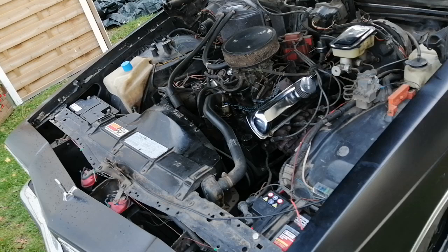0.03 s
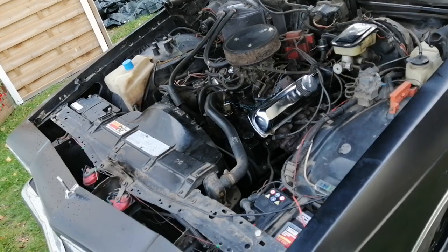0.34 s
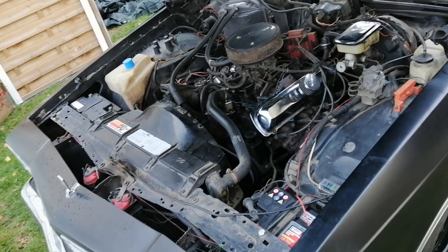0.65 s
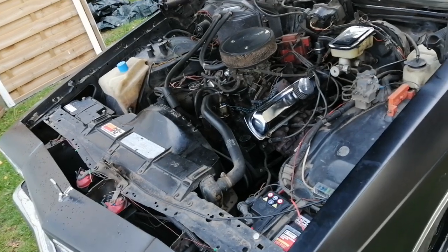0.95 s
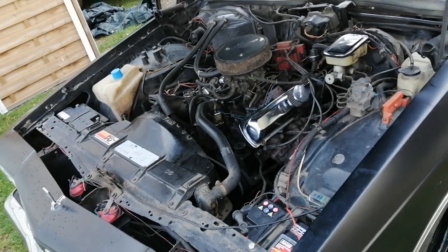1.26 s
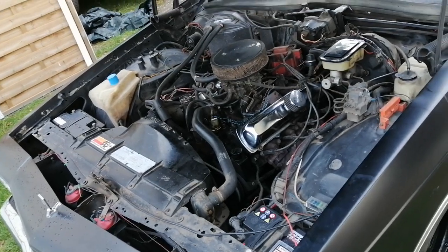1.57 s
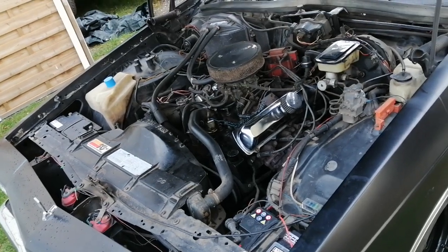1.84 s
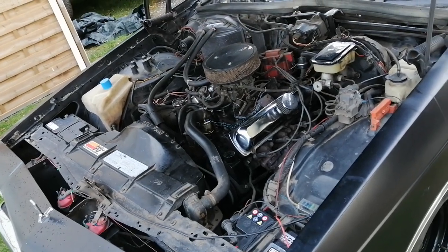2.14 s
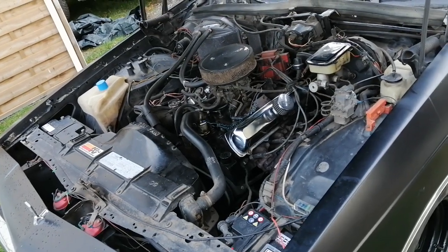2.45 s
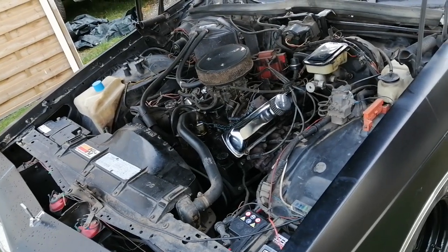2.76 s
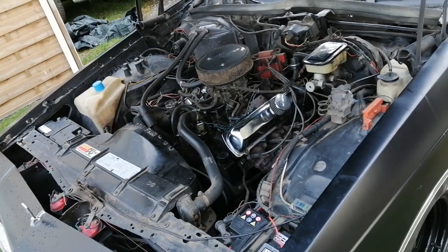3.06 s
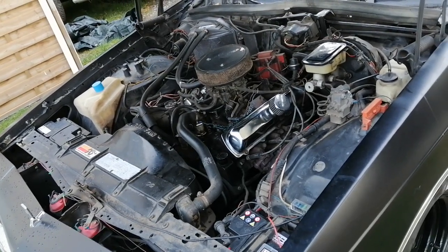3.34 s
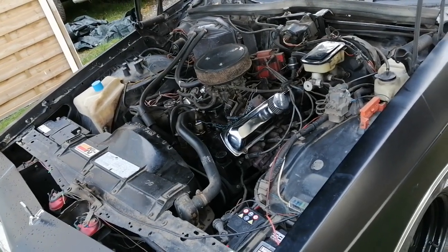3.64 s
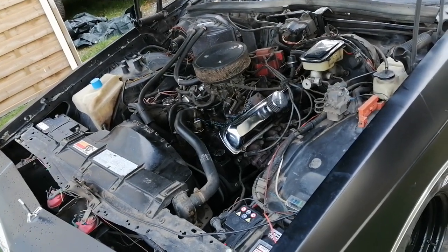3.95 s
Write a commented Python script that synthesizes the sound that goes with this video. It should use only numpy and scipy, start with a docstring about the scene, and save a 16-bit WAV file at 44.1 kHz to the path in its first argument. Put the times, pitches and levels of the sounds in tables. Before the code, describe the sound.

An old car engine cranks, catches and revs up into a heavy fast idle.

```python
"""Old V8 starting outdoors

A stereo pair stands close beside the open engine bay, in a quiet yard with light rustling.
The solenoid clacks, the pinion hits the ring gear and the starter grinds. The engine catches:
single exhaust thumps race up into the drone of a heavy fast idle, under the clatter of fan and
tappets. The pinion skips out of mesh and the released starter whines down."""
import sys
import numpy as np
from scipy import signal
from scipy.fft import rfft, irfft
from scipy.io import wavfile
from scipy.ndimage import map_coordinates

SR = 44100
rng = np.random.default_rng(int(sys.argv[2]) if len(sys.argv) > 2 else 0)


def digitize_waveform(pressure):
    """Quantize a signal to 16-bit integers and store it at the path in sys.argv[1].

    Rows of a 2-D input are taken as channels; values are limited to [-1, 1].
    """
    field = np.atleast_2d(pressure).T
    bounded = np.clip(field, -1, 1)
    quanta = np.round(bounded * 32767).astype(np.int16)
    wavfile.write(sys.argv[1], SR, quanta)


N = 176400
T = np.arange(N) / SR
HZ = np.fft.rfftfreq(N, 1 / SR)

# engine speed: t/s, firing rate/Hz
FIRING_RATE = [(2.2, 10), (2.45, 24), (2.55, 36), (2.65, 41), (2.75, 39), (2.82, 50), (2.88, 66),
               (2.94, 90), (3.0, 100), (3.08, 108), (3.35, 107), (3.5, 109), (3.8, 116), (4.0, 122)]
# strength of the eight cylinders in firing order: level/dB
CYLINDER_DB = [0, -3, -5.5, -6.5, 1.5, -4, -4, -2]


def amp(db):
    """Decibels to gain."""
    return 10 ** (np.asarray(db) / 20)


def unit(x):
    """Scales to rms 1."""
    return x / np.sqrt(np.mean(x ** 2) + 1e-20)


def curve(rows, column=1):
    """One column of a table, joined over time."""
    rows = np.array(rows)
    return np.interp(T, rows[:, 0], rows[:, column])


def level(rows, column=1):
    """Gain from a dB curve, silent before its first point."""
    return amp(curve(rows, column)) * (T >= rows[0][0])


def spectrum(points):
    """A table joined over log frequency."""
    f, value = np.transpose(points)
    return np.interp(np.log(HZ + 1), np.log(f + 1), value)


def colour(x, db):
    """Causal filter with the given dB response."""
    cepstrum = irfft(np.log(amp(np.maximum(db, -100))), N)
    causal = 2 * cepstrum * (np.arange(N) < N // 2) * (T > 0)
    taps = irfft(np.exp(rfft(causal)), N)[:4096]
    return signal.fftconvolve(np.atleast_2d(x), taps[None], axes=1)[:, :N]


def drift(hz):
    """Random wander of rms 1, mostly slower than hz."""
    coarse = T[::20]
    bins = rfft(rng.standard_normal(len(coarse)))
    smooth = irfft(bins * np.exp(-(HZ[:len(bins)] / hz) ** 2), len(coarse))
    return unit(np.interp(T, coarse, smooth))


def noise():
    """White noise at the two microphones, alike in the bass only."""
    # likeness of left and right: f/Hz, correlation
    likeness = [(150, .99), (450, .8), (1000, .1), (2000, -.1), (5000, 0)]
    a, b = rfft(rng.standard_normal((2, N)))
    same = np.clip(spectrum(likeness), -1, 1)
    return irfft(np.array([a, same * a + np.sqrt(1 - same ** 2) * b]), N)


def band(hz, width_hz):
    """A resonance kept ringing by friction."""
    return unit(irfft(rfft(noise()) / (1 + (2 * (HZ - hz) / width_hz) ** 2), N))


def swell(start, length, hz, width_hz, db):
    """A resonance that rises and dies away."""
    arch = np.sin(np.pi * np.clip((T - start) / length, 0, 1))
    return amp(db) * unit(band(hz, width_hz) * arch) * np.sqrt(np.mean(arch ** 2))


def place(x, balance):
    """Shares each frequency between the left and right microphone."""
    gains = amp(np.outer([.5, -.5], spectrum(balance)))
    return irfft(rfft(x) * gains / np.sqrt((gains ** 2).mean(0)), N)


def bay(x, echo=.55, decay_s=.007):
    """Quick reflections between bonnet, wings and bulkhead."""
    age = T[T < 4 * decay_s]
    taps = rng.standard_normal((2, len(age))) * np.exp(-age / decay_s) * (age > .002)
    taps *= echo / np.linalg.norm(taps, axis=1, keepdims=True)
    return unit(x + signal.fftconvolve(x, taps, axes=1)[:, :N])


def yard(air_db=-54.5, fall_db_per_s=1, waver_db=1.6, crinkle_db=1, sag_per_s=.083):
    """Outdoor air, with a soft rustle and a few scuffs close to the microphones."""
    # open air: f/Hz, level/dB
    air_colour = [(30, -8), (58, 2.5), (90, -7), (200, -7.5), (330, -15.5), (900, -15), (2800, -25),
                  (4000, -38.5), (15000, -49)]
    # rustle: t/s, level/dB
    rustle_level = [(.35, -63), (.42, -69), (.52, -60.5), (.67, -58.5), (.9, -60.5), (1.04, -64.5),
                    (1.14, -61), (1.28, -63.5), (1.85, -65), (2.0, -76.5), (2.17, -65)]
    # its hiss: f/Hz, level/dB
    rustle_colour = [(2500, -12.5), (4200, -11.5), (6000, 2.5), (7000, -9), (8000, -15), (10300, -25),
                     (11700, -18), (13000, -26), (15000, -23)]
    # small scuffs: t/s, length/s, f/Hz, width/Hz, level/dB
    scuffs = [(0.363, 0.12, 540, 110, -59), (0.795, 0.16, 508, 128, -55.5), (0.812, 0.16, 5300, 2000, -55),
              (1.057, 0.13, 4600, 2300, -57), (1.51, 0.024, 5660, 5000, -60)]
    air_gain = amp(air_db - fall_db_per_s * T - waver_db * drift(7.9))
    air = air_gain * unit(colour(noise(), spectrum(air_colour)))
    rustle = unit(colour(noise() * amp(crinkle_db * drift(200)), spectrum(rustle_colour)))
    sag = 1 - sag_per_s * (T - .5)  # the rustle slows and drops in pitch
    rustle = np.array([map_coordinates(side, [np.cumsum(sag)], order=3) for side in rustle])
    return air + level(rustle_level) * rustle + sum(swell(*row) for row in scuffs)


def clacks(attack_s=.00077, lift_octaves=.78):
    """Each steel blow sets off a dense, quickly dying ring in the engine bay."""
    # solenoid, pinion into ring gear, one caught tooth: t/s, level/dB, decay/s, f/Hz, lift/dB
    blows = [(2.175, -24.5, 0.021, 1880, 9), (2.1947, -21.5, 0.015, 750, 11.5),
             (2.839, -30, 0.006, 10000, 14)]
    # struck steel: f/Hz, level/dB
    steel_colour = [(80, -36), (218, -5.5), (380, -11), (600, -5.5), (1730, -7.5), (3770, -12.5),
                    (5280, -5), (8600, -12.5), (15000, -29)]
    out = 0
    for start, db, decay_s, centre_hz, lift_db in blows:
        age = np.maximum(T - start, 0)
        envelope = np.minimum(age / attack_s, 1) * np.exp(-age / decay_s)
        lift = lift_db * np.exp(-(np.log2((HZ + 1) / centre_hz) / lift_octaves) ** 2)
        out = out + amp(db) * envelope * unit(colour(noise(), spectrum(steel_colour) + lift))
    return out


def housing(hz):
    """Lift in dB that the starter and bell housing give at these frequencies."""
    # resonances: f/Hz, width/Hz, lift/dB
    modes = [(710, 34, 8.5), (865, 42, 12), (1200, 40, 4), (1370, 40, 2.5), (1667, 42, 16.5), (2010, 50, 9)]
    return sum(db / (1 + (2 * (hz - centre) / width) ** 2) for centre, width, db in modes)


def starter(wobble=.003, tooth_depth=.2, grain=.2, rasp_ring=.18, roughness=.38, load_s=2.376):
    """Teeth rasp and ring; the rotor whines up and coasts down, flaring at each housing resonance."""
    # grinding teeth: t/s, level/dB
    grind_level = [(2.185, -70), (2.205, -26), (2.24, -35), (2.365, -36.5), (2.39, -33.5), (2.48, -30),
                   (2.65, -31.5), (2.85, -28), (3.135, -27.5), (3.17, -32), (3.5, -35.5)]
    # their rasp: f/Hz, level/dB
    grind_colour = [(300, -19), (600, -14), (950, -6.5), (1260, -12.5), (1850, -5.5), (2320, -10),
                    (3060, -6.5), (3790, -15), (5300, -8.5), (6480, -17), (8300, -13), (10700, -27),
                    (13300, -31), (15000, -31)]
    # singing ring gear: t/s, level/dB
    gear_level = [(2.195, -58), (2.206, -31.5), (2.24, -39), (2.36, -49), (2.42, -34), (2.6, -40.5),
                  (3.1, -37.5), (3.22, -48)]
    # starter rotor: t/s, rotation/Hz, whine level/dB
    rotor = [(2.45, 112, -60), (2.58, 127.4, -52), (2.66, 138, -41.5), (2.76, 145, -40), (2.84, 153, -51),
             (3.0, 177, -51), (3.13, 194, -49), (3.22, 185.5, -41.5), (3.52, 171, -40.5), (3.6, 165, -49),
             (4.0, 144, -50)]
    # whine lines: multiple of the rotation, level/dB
    whine_lines = [(3, -6.5), (5, 2.5), (7, -12.5), (8, -7), (9, -4)]
    speed = curve(rotor)
    turns = np.cumsum(speed * (1 + wobble * drift(17.7))) / SR
    teeth = (1 + tooth_depth * np.cos(2 * np.pi * turns)) * np.exp(grain * drift(450))
    rasp = bay(colour(noise() * teeth, spectrum(grind_colour) + rasp_ring * housing(HZ)))
    dull = signal.lfilter(*signal.butter(1, 4770, fs=SR), rasp)
    rasp = np.where(T < load_s, dull, rasp)  # soft until the engine takes up the load
    mic_radians = np.array([[0], [1]])  # the whine reaches the two microphones out of step
    whine = 0
    for order, db in whine_lines:
        phase = 2 * np.pi * (order * turns + rng.random()) + mic_radians
        gain = amp(db + housing(order * speed)) * (1 + roughness * drift(35))
        whine = whine + gain * np.cos(phase)
    gear = level(gear_level) * teeth * band(hz=5250, width_hz=520)
    return level(grind_level) * rasp + gear + level(rotor, column=2) * whine


def ringing_parts():
    """Metal parts in the bay sing for a moment."""
    # brief resonances: t/s, length/s, f/Hz, width/Hz, level/dB
    rings = [(2.25, 0.16, 894, 61, -41.5), (2.254, 0.13, 1365, 40, -41), (3.028, 0.058, 3230, 130, -27),
             (3.541, 0.031, 3260, 200, -33.5)]
    return sum(swell(*row) for row in rings)


def strokes(firings, spread_db):
    """One click per firing, uneven from cylinder to cylinder; constant mean power."""
    at = np.flatnonzero(np.diff(np.floor(firings)) > 0)
    clicks = np.zeros(N)
    clicks[at] = amp(np.resize(CYLINDER_DB, len(at)) + spread_db * rng.standard_normal(len(at)))
    return clicks / np.sqrt(curve(FIRING_RATE))


def clatter(firings, pulse_depth=.27, flutter_db=.5, tappet_db=-6.5, tick_s=.0021):
    """Fan and intake rush in pulses with the firings; tappets tick in between."""
    # fan and valve gear: t/s, level/dB
    clatter_level = [(2.38, -81), (2.5, -40), (2.75, -36.5), (2.95, -32.5), (3.2, -30.5), (3.5, -28.5),
                     (3.75, -30), (4.0, -30)]
    # their tone: f/Hz, level/dB
    clatter_colour = [(250, -23), (370, -3), (570, -6), (950, -3.5), (1180, -16), (1730, -8.5), (2360, -16),
                      (3340, -15.5), (3940, -31), (5130, -22.5), (6360, -25), (8420, -25.5), (10800, -46),
                      (15000, -44)]
    pulse = 1 + pulse_depth * np.exp(-(firings % 1) / .31)
    rush = unit(noise() * pulse * amp(flutter_db * drift(60)))
    ticks = signal.lfilter([1], [1, -np.exp(-1 / (tick_s * SR))], strokes(firings + .5, spread_db=2))
    tappets = amp(tappet_db) * unit(ticks * noise())
    return level(clatter_level) * bay(colour(rush + tappets, spectrum(clatter_colour)))


def exhaust(firings, puff=1.1, throb=.84, throb_below_hz=126):
    """Each firing thumps the pipe and pushes out a puff of gas; at low speed the block throbs too."""
    # separate thumps: t/s, level/dB
    thump_level = [(2.42, -62), (2.48, -38.5), (2.55, -37), (2.68, -38.5), (2.79, -33), (2.86, -28.5),
                   (2.96, -23), (3.12, -37), (4.0, -31)]
    # exhaust pipe: f/Hz, level/dB
    pipe_colour = [(18, -28), (38, -14.5), (70, -1), (100, 5), (170, 0), (250, -4), (320, -18), (450, -15),
                   (900, -27), (3000, -97)]
    puffs = unit(noise() * np.exp(-(firings % 1) / .92))
    kicks = unit(strokes(firings, spread_db=1.5))
    thumps = unit(colour(kicks + puff * puffs, spectrum(pipe_colour)))
    slow = np.clip(2 * (1 - curve(FIRING_RATE) / throb_below_hz), 0, 1)
    return level(thump_level) * (thumps + throb * slow * np.cos(2 * np.pi * firings))


def overrun(skips_per_s=420, skip_s=.0012):
    """The engine outruns the pinion: a bright grit of skipping teeth, until it drops out of mesh."""
    # skipping teeth: t/s, level/dB
    skip_level = [(2.7, -55), (2.86, -40), (3.145, -40.5), (3.17, -63)]
    hits = (rng.random(N) < skips_per_s / SR) * (.5 + rng.random(N))
    ticks = signal.lfilter([1], [1, -np.exp(-1 / (skip_s * SR))], hits)
    return level(skip_level) * unit(ticks * band(hz=8100, width_hz=2400))


def drone(firings, settle_s=(3.4, 3.71), waver=.18, smear_cycles=.22, chug=.11):
    """At speed the firings merge into wavering multiples of the engine cycle, with a growl above."""
    # steady exhaust: t/s, level/dB
    drone_level = [(2.8, -55), (2.95, -32.5), (3.06, -25), (3.5, -25.5), (3.75, -22), (4.0, -22.5)]
    # its lines: multiple of the engine cycle, level just caught/dB, level settled/dB
    lines = [(5, -63, -52), (7, -51, -41), (8, -34, -35), (9, -45, -31), (10, -42, -47), (11, -29.5, -23.5),
             (12, -32, -36), (13, -24, -24), (14, -32, -34.5), (15, -38, -41), (16, -33, -30),
             (17, -51, -41), (18, -35.5, -31.5), (19, -33, -35), (20, -38.5, -43), (27, -53, -36)]
    growl = [(order, -47.5, -47.5) for order in range(26, 44)]
    cycles = firings / len(CYLINDER_DB)
    settled = np.interp(T, settle_s, [0, 1])
    out, power = 0, 0
    for order, early_db, late_db in lines + growl:
        gain = amp(early_db) + settled * (amp(late_db) - amp(early_db))
        lag = smear_cycles * (order - len(CYLINDER_DB)) ** 2  # the pipe smears the pulses
        phase = 2 * np.pi * (order * cycles + lag) + waver * drift(7.2)
        out = out + gain * (1 + waver * drift(8.2)) * np.cos(phase)
        power = power + gain ** 2 / 2
    uneven = 1 + chug * drift(70)
    return level(drone_level) * uneven * out / np.sqrt(power)


def scene(silent_until_s=.3535):
    """The engine bay in front of the microphones, the yard around them; silence at the very start."""
    # engine across the pair: f/Hz, left minus right/dB
    engine_balance = [(100, -4), (1300, -3.5), (2400, -2), (4800, -6.5), (6300, -5.5), (8200, 20.5),
                      (10500, 8), (13000, 0.5)]
    # yard across the pair: f/Hz, left minus right/dB
    yard_balance = [(60, -5.5), (2000, -7.5), (4000, -11.5), (5800, -21.5), (8000, 5.5), (11500, -5)]
    firings = np.cumsum(curve(FIRING_RATE)) / SR  # running count
    metal = starter() + overrun() + clacks() + ringing_parts()
    engine = exhaust(firings) + drone(firings) + clatter(firings) + metal
    return (place(engine, engine_balance) + place(yard(), yard_balance)) * (T > silent_until_s)


def record(dry, edge_hz=15500):
    """The recorder's band limit."""
    lowpass = signal.firwin(301, edge_hz, window=("kaiser", 9), fs=SR)
    return signal.oaconvolve(dry, lowpass[None], "same")


dry = scene()
out = record(dry)
digitize_waveform(out)
```